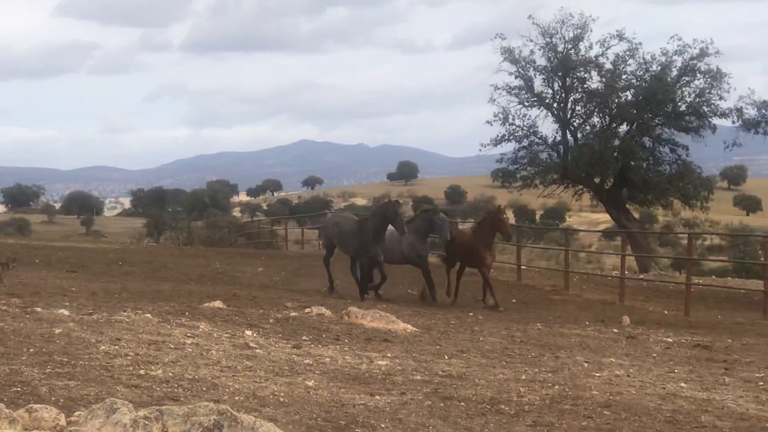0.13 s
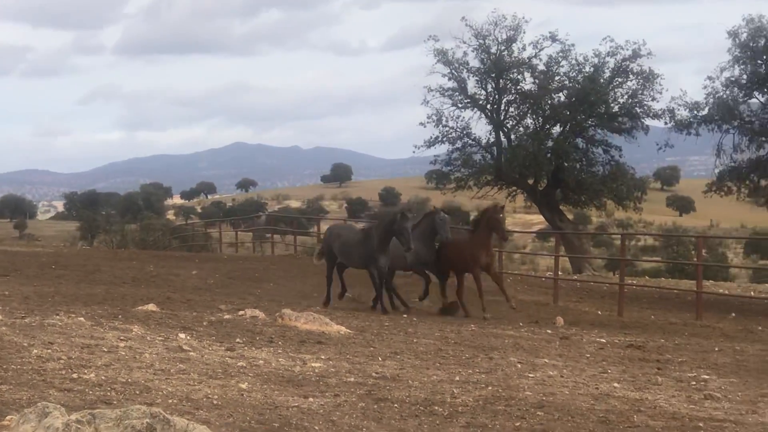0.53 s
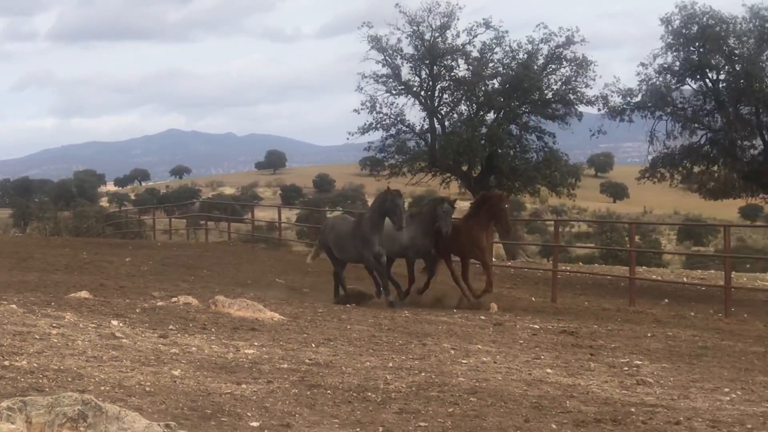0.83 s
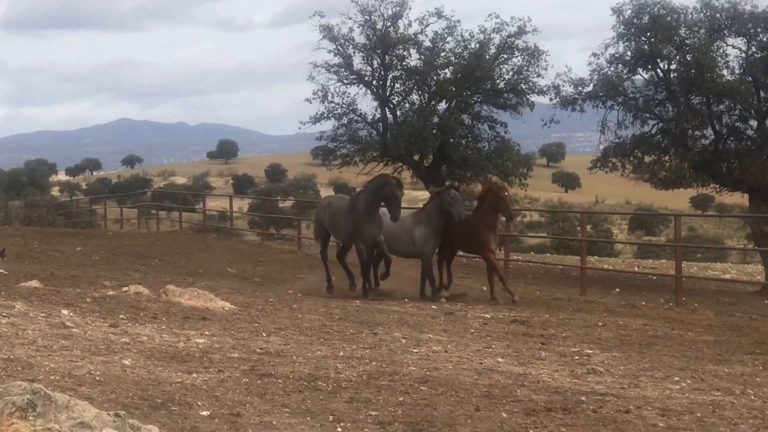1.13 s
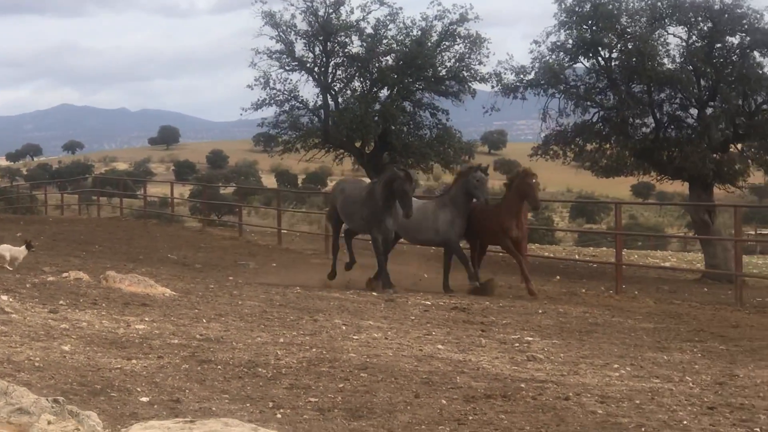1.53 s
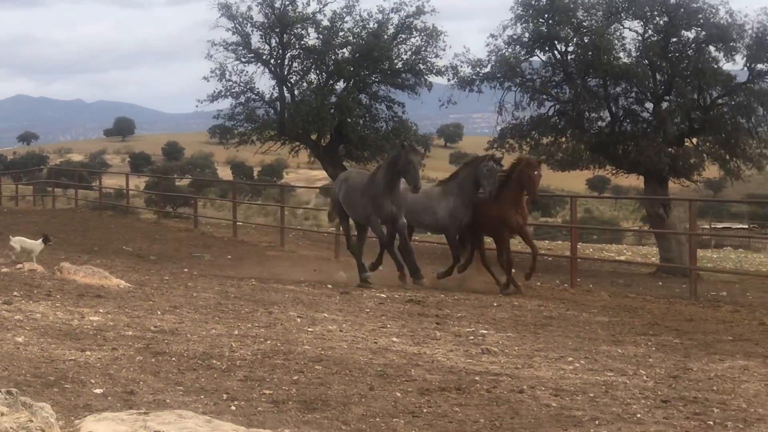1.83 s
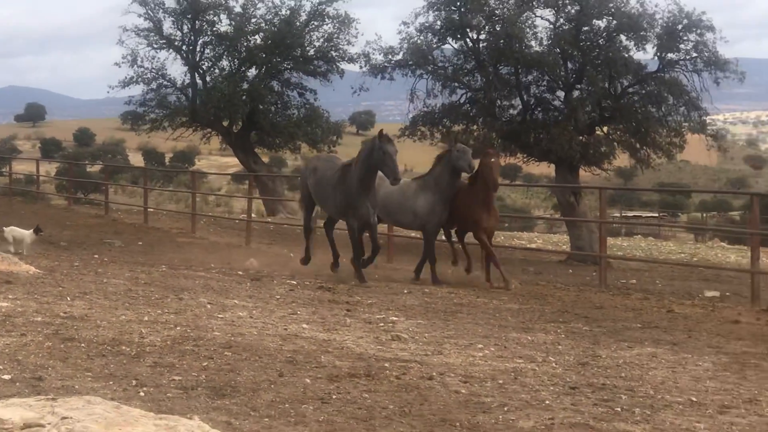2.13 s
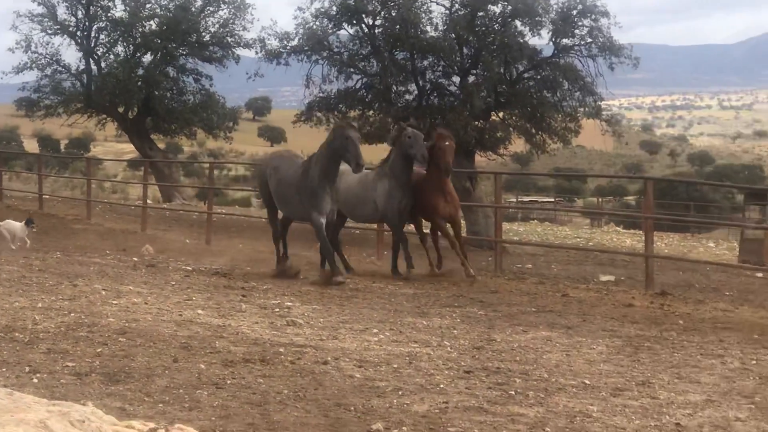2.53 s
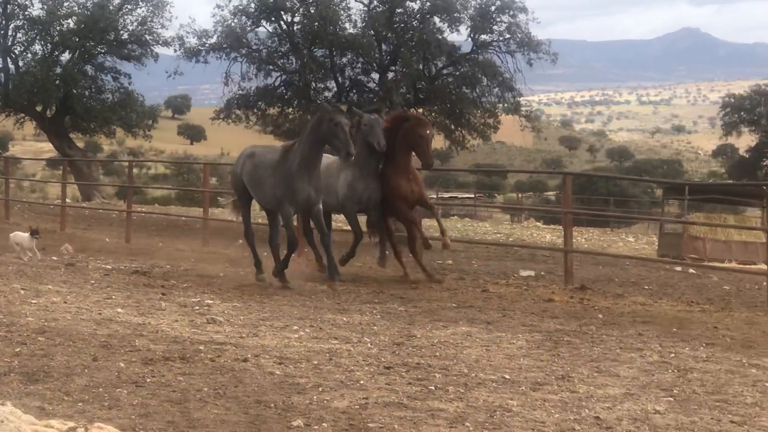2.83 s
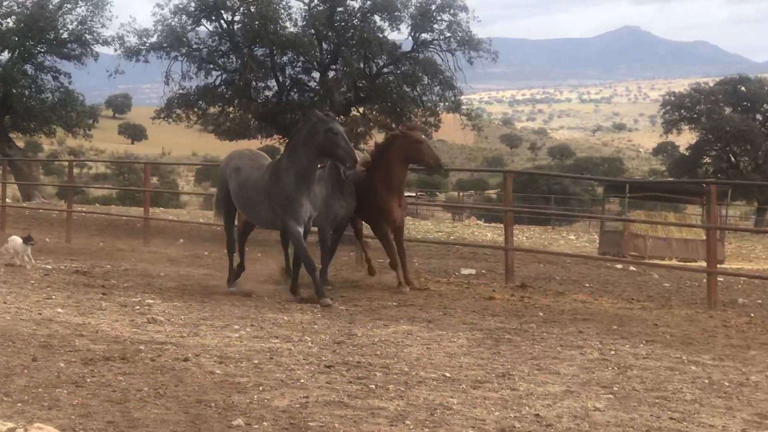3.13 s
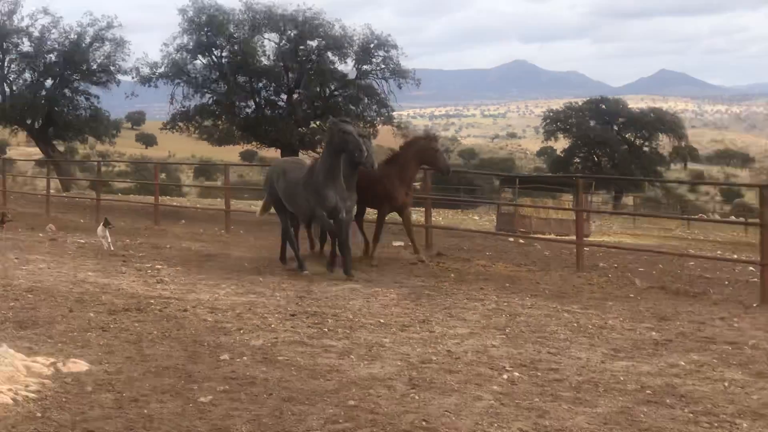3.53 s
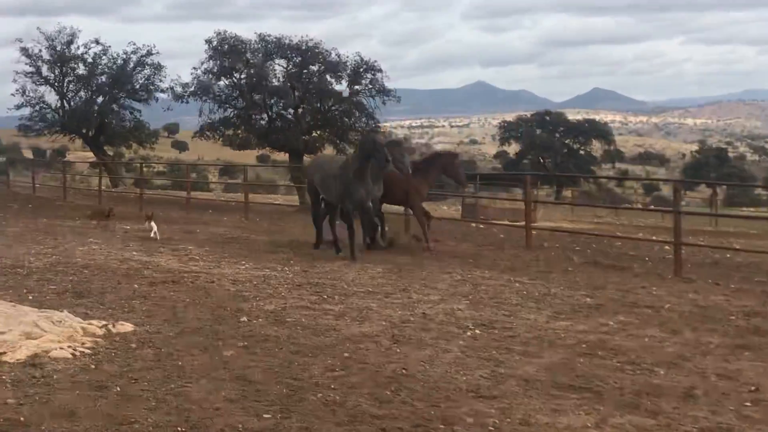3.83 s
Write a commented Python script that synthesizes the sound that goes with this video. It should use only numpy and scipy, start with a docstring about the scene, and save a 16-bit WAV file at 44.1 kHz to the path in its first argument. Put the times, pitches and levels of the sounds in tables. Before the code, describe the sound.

A horse squeals from about 0.3 to 2.1 seconds: a thin, fluttering, whistle-like tone that rises slightly, then sinks and turns hoarse from around 1. Hooves thud, click and scuff on dry dirt throughout; a brief snort comes at 2.2 and a stone clinks at 2.8. Distant birds twitter. Wind rumbles in lumps, around 1 and strongest near 2.9-3.2, over faint outdoor hiss.

```python
"""Filtered noise gives a faint outdoor hiss, and lumpy turbulence with brief swings buffets the microphone.
Horses canter over a dry dirt paddock: grains trample, sines thud, noise bursts click, scrape and scuff grit.
One horse gives a long, thin squeal, a clean gliding tone that sinks and turns hoarse in wavering strands.
Small birds twitter in the distance as short sine glides; later a chopped puff of noise is a horse's snort,
and decaying sines ring as a hoof strikes a stone. A very faint electrical whine lies under it all."""
import sys
import numpy as np
from scipy import signal
from scipy.fft import rfft, irfft
from scipy.io import wavfile

SR = 44100
rng = np.random.default_rng(int(sys.argv[2]) if len(sys.argv) > 2 else 0)


def digitize_waveform(pressure):
    """Quantize a signal to 16-bit integers and store it at the path in sys.argv[1].

    Rows of a 2-D input are taken as channels; values are limited to [-1, 1].
    """
    field = np.atleast_2d(pressure).T
    bounded = np.clip(field, -1, 1)
    quanta = np.round(bounded * 32767).astype(np.int16)
    wavfile.write(sys.argv[1], SR, quanta)


N = 176400
T = np.arange(N) / SR  # seconds


def amp(db):
    """Turns decibels into gain."""
    return 10 ** (np.asarray(db) / 20)


def unit(x):
    """Scales a signal to rms 1."""
    return x / np.sqrt(np.mean(x ** 2) + 1e-20)


def curve(rows, axis=1):
    """Draws one column of a control table as straight lines through every sample."""
    rows = np.array(rows)
    return np.interp(T, rows[:, 0], rows[:, axis])


def add(mix, s, sound):
    """Mixes a sound in at a time in seconds, cut off at the end of the scene."""
    part = mix[max(0, round(s * SR)):][:len(sound)]
    part += sound[:len(part)]


def colour(x, points):
    """Filters by a spectrum of (Hz, dB) points on a log frequency scale, to rms 1."""
    f, db = np.transpose(points)
    log_hz = np.log(np.fft.rfftfreq(N, 1 / SR) + 1)
    gain = amp(np.interp(log_hz, np.log(f), db))
    return unit(irfft(rfft(x) * gain, N))


def band(x, low_hz, high_hz):
    """Keeps one frequency band of a sound."""
    return signal.sosfilt(signal.butter(2, [low_hz, high_hz], "band", fs=SR, output="sos"), x)


def drift(hz):
    """Smooth chance motion of rms 1, low-passed with half gain at the given rate."""
    rolloff = 1 + (np.fft.rfftfreq(N, 1 / SR) / hz) ** 4
    return unit(irfft(rfft(rng.standard_normal(N)) / rolloff, N))


def fuzzy(hz, width):
    """Turbulence in a moving resonance: two slow noises ride on a cosine and a sine."""
    turn = 2 * np.pi * np.cumsum(hz) / SR
    return unit(drift(width / 2) * np.cos(turn) + drift(width / 2) * np.sin(turn))


def strand(hz, width):
    """An unsteady partial with turbulence around it."""
    wobble, line_share = .03, .45  # rms share of the pitch, share of the power
    line = unit(np.sin(2 * np.pi * np.cumsum(hz * (1 + wobble * drift(58.6))) / SR))
    return np.sqrt(line_share) * line + np.sqrt(1 - line_share) * fuzzy(hz, width)


def field(x):
    """Faint scatter from trees and ground: a decaying noise tail that starts 12 ms late."""
    t, t60_s = T[:SR], .5
    tail = rng.standard_normal(SR) * amp(-60 * t / t60_s) * (t > .012)
    return signal.fftconvolve(x, tail / np.linalg.norm(tail))[:N]


def air():
    """Steady outdoor hiss: noise shaped by one fixed spectrum."""
    # Spectrum of the hiss. Each row: frequency in Hz, relative level in dB.
    air_spectrum = [(59, -5.5), (100, -6), (156, -1), (281, -16.5), (697, -17.5), (774, -22.5),
                    (1960, -26.5), (2630, -29.5), (3050, -25.5), (4190, -29.5), (4860, -32.5),
                    (6120, -31.5), (7730, -36.5), (8410, -35.5), (15500, -40.5)]
    air_db = -61.5  # rms
    return amp(air_db) * colour(rng.standard_normal(N), air_spectrum)


def wind():
    """Lumpy turbulence at the microphone, with single eddies as brief pressure swings."""
    # Wind on the microphone, before trim.
    # Each row: time in seconds, rumble level in dB (mainly below 130 Hz), flap level in dB (mainly above).
    wind_levels = [(0, -55.5, -54.5), (0.08, -65.5, -63), (0.19, -39, -55.5), (0.27, -57.5, -73),
                   (0.36, -54, -59.5), (0.53, -62, -66), (0.6, -51.5, -56.5), (0.72, -58, -59),
                   (0.82, -41.5, -55), (0.86, -52, -61.5), (0.94, -48, -48.5), (1.03, -37.5, -38.5),
                   (1.085, -42, -35.5), (1.12, -40.5, -45.5), (1.2, -42, -46.5), (1.27, -52.5, -52.5),
                   (1.34, -41.5, -45), (1.44, -43.5, -49), (1.55, -55, -48.5), (1.63, -47.5, -45.5),
                   (1.71, -52, -49), (1.78, -54, -62), (1.85, -38, -49.5), (1.93, -51, -51.5),
                   (2.04, -68, -52.5), (2.12, -46.5, -47), (2.2, -64.5, -64), (2.28, -56, -64),
                   (2.39, -72, -72), (2.47, -55.5, -60), (2.52, -52.5, -57.5), (2.69, -50, -55),
                   (2.75, -63, -55), (2.82, -62, -88), (2.92, -28, -40.5), (3.0, -43.5, -58),
                   (3.08, -45.5, -53.5), (3.125, -23.5, -31), (3.165, -36.5, -50), (3.2, -35.5, -41.5),
                   (3.3, -39, -58), (3.38, -38.5, -52), (3.45, -56, -58.5), (3.55, -45, -56.5),
                   (3.64, -63, -60.5), (3.92, -62, -61.5), (4.0, -52, -61)]
    # Spectra of the low rumble and the flap above it. Each row: frequency in Hz, relative level in dB.
    rumble_spectrum = [(15, -46), (30, -28), (48, 1.5), (75, 1), (120, -4), (180, -14.5), (400, -60),
                       (1000, -112)]
    flap_spectrum = [(40, -16), (100, -8), (150, -1), (230, -6.5), (330, -12), (500, -21.5), (800, -39.5),
                     (3000, -67)]
    # Single eddies striking the microphone.
    # Each row: centre in seconds, frequency in Hz, level in dB of the sine before its envelope.
    buffets = [(.141, 137, -38), (.193, 170, -37), (0.217, 171, -28), (.397, 240, -40.5),
               (.467, 179, -43.5), (0.965, 218, -37), (1.001, 175, -32), (1.035, 167, -26.5),
               (1.099, 199, -24.5), (1.334, 170, -31.5), (1.354, 233, -36), (1.405, 217, -31.5),
               (1.467, 170, -32.5), (1.519, 149.3, -29), (1.654, 114, -28.5), (1.873, 187, -26.5),
               (2.854, 67, -31.5), (2.917, 135, -25), (2.929, 83, -18.5), (3.11, 116, -15),
               (3.123, 178, -16.5), (3.135, 63, -20.5), (3.185, 155, -23.5), (3.533, 55, -38)]
    rumble_trim_db, flap_trim_db = -1, -1
    gust_db, gust_hz = 5.5, 36.6  # rms swing, rate
    eddy_cycles, eddy_reach = .3, 20  # envelope width in cycles, limit in envelope widths

    rumble = colour(rng.standard_normal(N), rumble_spectrum)
    rumble *= amp(curve(wind_levels) + rumble_trim_db)
    gusty = rng.standard_normal(N) * amp(gust_db * drift(gust_hz))
    flap = colour(gusty, flap_spectrum) * amp(curve(wind_levels, axis=2) + flap_trim_db)
    out = rumble + flap
    for s, hz, db in buffets:
        cycles = (T - s) * hz
        envelope = 1 / np.cosh(np.clip(cycles / eddy_cycles, -eddy_reach, eddy_reach))
        out += amp(db) * np.sin(2 * np.pi * cycles) * envelope
    return out


def hooves():
    """Dull decaying thuds, stone clicks, hollow scrapes and grainy scuffs over light trampling."""
    # Hooves thudding on packed earth.
    # Each row: start in seconds, frequency in Hz, level in dB of the sine before onset and decay.
    thuds = [(.657, 460, -51.5), (1.022, 413, -39), (1.088, 540, -42.5), (2.042, 290, -43),
             (2.105, 483, -45.5), (2.132, 283, -39.5), (2.214, 240, -41.5), (2.587, 200, -38),
             (2.68, 150, -35.5), (3.375, 415, -46.5), (3.604, 534, -38), (3.76, 460, -40.5),
             (3.981, 240, -40.5)]
    # Hooves clicking on stones, and two longer, hollow scrapes of a scuff near 1.2 kHz.
    # Each row: start in seconds, frequency in Hz, peak in dB, time of the burst to fall 60 dB in seconds.
    clicks_and_scrapes = [(.466, 3800, -59, 0.055), (.471, 7940, -56.5, 0.028), (1.02, 1320, -51.5, 0.022),
                          (1.577, 2522, -49.5, .03), (1.915, 1710, -48.5, 0.025),
                          (2.0192, 1830, -47, 0.018), (2.486, 2110, -52, 0.022),
                          (2.532, 2150, -50.5, 0.043), (2.796, 1500, -50, 0.037), (3.175, 1140, -55, 0.28),
                          (3.225, 1300, -55.5, 0.2), (3.94, 2760, -51.5, 0.054), (3.951, 2870, -51, 0.036)]
    # Hooves scuffing grit.
    # Each row: start in seconds, time to fall to 1/e in seconds, level in dB before onset and fall.
    scuffs = [(0.458, 0.017, -61), (0.541, 0.058, -67), (1.556, 0.059, -64.5), (1.886, 0.076, -60.5),
              (2.177, 0.02, -62.5), (2.327, 0.028, -66), (2.484, 0.035, -59), (2.529, 0.031, -58.5),
              (2.622, 0.1, -60), (2.774, 0.21, -67), (2.944, 0.29, -70), (3.15, 0.13, -61),
              (3.322, 0.07, -65.5), (3.482, 0.063, -63.5), (3.742, 0.047, -65.5), (3.836, 0.047, -65),
              (3.942, 0.022, -62.5)]
    # Spectrum of the grit. Each row: frequency in Hz, relative level in dB.
    grit_spectrum = [(150, 8.5), (500, 2.5), (1000, 5), (2000, -1), (2700, -1), (4000, -1.5), (5200, -11.5),
                     (8000, -19.5), (15000, -28.5)]
    thud_t60_s, crush_db = 0.03, -16  # crushed earth, relative to the thud's sine
    grain_db, grain_hz = 2.5, 400  # rms swing, rate
    trample_per_s, trample_db, step_decay_s = 110, -71, 0.023

    out, t = np.zeros(N), T[:SR // 4]
    for s, hz, db in thuds:
        crush = unit(band(rng.standard_normal(len(t)), hz / 2, hz * 2))
        body = np.sin(2 * np.pi * hz * t) + amp(crush_db) * crush
        onset = np.minimum(t / 0.0017, 1)
        add(out, s, amp(db - 60 * t / thud_t60_s) * onset * body)
    for s, hz, db, t60 in clicks_and_scrapes:
        burst = rng.standard_normal(len(t)) * amp(-60 * t / t60)
        contact = band(burst, hz * 0.63, hz * 1.22)
        add(out, s, amp(db) * contact / abs(contact).max())

    push = np.zeros(N)
    for s, length, db in scuffs:
        u = T[:SR // 2] / length
        add(push, s, amp(db) * np.minimum(u / 0.12, 1) * np.exp(-u ** 2))
    taps = (rng.random(N) < trample_per_s / SR).astype(float)
    steps = signal.lfilter([1], [1, -np.exp(-1 / (step_decay_s * SR))], taps)
    grit = colour(rng.standard_normal(N) * amp(grain_db * drift(grain_hz)), grit_spectrum)
    return out + grit * np.hypot(push, amp(trample_db) * unit(steps))


def squeal():
    """A fluttering whistle-like tone that breaks up into wavering, hoarse strands."""
    # Pitch of the clean tone. Each row: time in seconds, pitch in Hz before jitter.
    pitch = [(.33, 1680), (.46, 1710), (.58, 1775), (.8, 1814), (.95, 1780), (1.12, 1737), (1.29, 1788),
             (1.4, 1730), (1.47, 1744), (1.52, 1706), (1.64, 1649), (1.69, 1569), (1.77, 1532),
             (1.84, 1588), (1.9, 1534), (2.05, 1551)]
    # Clean tone before flutter. Each row: time in seconds, level in dB, level of its octave in dB.
    clean = [(.3, -88, -105), (.37, -73, -99), (.44, -66.5, -97), (.54, -69, -90), (.58, -58, -78.5),
             (.8, -57, -73), (.95, -60, -77), (1.06, -68, -86), (1.15, -65, -90), (1.23, -67.5, -88),
             (1.29, -57.5, -82), (1.35, -68, -92), (1.48, -70, -94), (1.52, -62.5, -88), (1.56, -72, -94),
             (1.71, -71, -92), (1.76, -66.5, -87), (1.83, -68, -89), (1.86, -78, -94), (2.05, -83, -99)]
    # Brief catches in the clean tone. Each row: centre in seconds, depth from 0 to 1.
    catches = [(.475, .5), (.53, .6), (.635, .8), (.686, .35), (.734, 1), (.782, .95), (.846, .7),
               (.872, .6), (.904, .9), (.945, .35), (.995, .7)]
    # Hoarse part. Each row: time in seconds, centre in Hz, level in dB.
    hoarse = [(.4, 1712, -94), (.8, 1833, -70.5), (.97, 1731, -67.5), (1.05, 1697, -71),
              (1.11, 1675, -61.5), (1.3, 1656, -69), (1.47, 1607, -63.5), (1.62, 1584, -63),
              (1.78, 1541, -65), (1.86, 1515, -70), (2.1, 1470, -88)]
    # Strands at fixed ratios to the hoarse centre: one below that splits off as the squeal sinks,
    # a late resonance about a third above the hoarse centre, a little below the upper one,
    # the upper resonance and the octave. Each row: time in seconds, level in dB.
    lower = [(.9, -100), (1.1, -89), (1.45, -72), (1.7, -70), (1.88, -74), (2.05, -88)]
    late = [(1.3, -99), (1.5, -73), (1.75, -66.5), (1.899, -83)]
    upper = [(.72, -85), (.88, -75), (1.03, -75), (1.2, -71), (1.33, -74), (1.47, -74), (1.65, -79),
             (2.05, -87)]
    octave = [(.6, -94), (.8, -85), (1.02, -74), (1.12, -68), (1.22, -73), (1.5, -74.5), (1.75, -75.5),
              (2.0, -92)]
    jitter, jitter_hz = 0.004, 52.7  # rms share of the pitch, rate
    catch_s = .011  # time from the centre of a catch to 1/e of its depth
    flutter_db, flutter_hz = 1.2, 50  # rms swing, rate
    rasp_db, rasp_hz = 2, 70  # rms swing, rate
    break_db, break_hz = 3.5, 22  # rms swing, rate
    hoarse_width_hz, side_width_hz = 250, 380

    turn = 2 * np.pi * np.cumsum(curve(pitch) * (1 + jitter * drift(jitter_hz))) / SR
    catch = sum(depth * np.exp(-((T - s) / catch_s) ** 2) for s, depth in catches)
    flutter = (1 - catch) * amp(flutter_db * drift(flutter_hz) + 0.5)
    partials = np.sin(turn) * amp(curve(clean)) + np.sin(2 * turn) * amp(curve(clean, axis=2))
    tone = np.sqrt(2) * flutter * partials  # root 2 makes the levels rms

    hz = curve(hoarse)
    roughness = unit(amp(rasp_db * drift(rasp_hz)))
    rasp = strand(hz, hoarse_width_hz) * amp(curve(hoarse, axis=2)) * roughness
    for ratio, levels in (.92, lower), (1.3, late), (1.36, upper), (2, octave):
        broken = unit(amp(break_db * drift(break_hz)))
        rasp = rasp + strand(hz * ratio, side_width_hz) * broken * amp(curve(levels))
    # 14 ms fades at both ends
    sounding = np.clip(np.minimum(T - clean[0][0], hoarse[-1][0] - T) / 0.014, 0, 1)
    return (tone + rasp) * sounding


def birds():
    """Quick, warbling sine glides in the distance, with their scatter."""
    # Bird chirps, with pitches before warble and levels before scatter.
    # Each row: start in seconds, length in seconds, start, middle and end pitch in Hz, rms level in dB.
    chirps = [(0.573, 0.047, 4620, 4500, 3680, -75.5), (0.674, 0.026, 4450, 3750, 3150, -66),
              (0.733, .045, 3400, 3260, 2630, -71), (1.107, 0.021, 5860, 5500, 5850, -71),
              (1.124, 0.027, 4650, 4400, 3450, -67.5), (1.207, 0.011, 3700, 4200, 4650, -62.5),
              (1.225, 0.014, 4150, 4450, 4680, -66), (1.239, 0.033, 4700, 5150, 4800, -74),
              (1.25, 0.049, 7000, 6630, 5870, -76), (1.269, 0.021, 4570, 4740, 3780, -66),
              (1.291, 0.016, 5550, 5480, 4650, -70), (1.309, 0.027, 4700, 4400, 3630, -66),
              (1.345, 0.046, 5340, 5500, 4600, -76), (1.348, .027, 4570, 4350, 3600, -72),
              (1.708, 0.032, 4790, 5120, 5240, -75), (1.851, 0.045, 6140, 5750, 4900, -72),
              (1.987, .042, 3930, 4180, 4900, -69.5), (2.187, 0.044, 3580, 3000, 2640, -75),
              (2.239, 0.043, 3550, 3780, 3830, -68), (2.365, 0.052, 4040, 3620, 3300, -77),
              (2.632, 0.032, 2820, 3080, 3240, -80), (2.797, 0.06, 3250, 3420, 3580, -75),
              (2.801, .125, 1752, 1826, 1898, -74.5), (2.923, 0.046, 3300, 3400, 3650, -77),
              (2.997, 0.11, 4250, 4820, 5110, -79.5), (3.088, 0.044, 4960, 5020, 5030, -76),
              (3.219, 0.04, 4230, 4350, 3820, -71), (3.269, 0.068, 3090, 3530, 4000, -74)]
    warble_depth, warble_hz = .015, 170  # rms share of the pitch, rate
    echo_db = -3  # scatter, relative to the chirps

    out, warble = np.zeros(N), 1 + warble_depth * drift(warble_hz)
    for s, length, a, b, c, db in chirps:
        u = np.linspace(0, 1, int(length * SR))
        glide = np.polyval(np.polyfit([0, .5, 1], [a, b, c], 2), u)
        hz = glide * warble[round(s * SR):][:len(u)]
        swell = np.sqrt(u * (1 - u))
        add(out, s, amp(db) * unit(swell * np.sin(2 * np.pi * np.cumsum(hz) / SR)))
    return out + amp(echo_db) * field(out)


def snort():
    """A horse's nostrils flap and chop a short puff of air."""
    # Spectrum of the nostrils. Each row: frequency in Hz, relative level in dB.
    nostril = [(80, -18), (170, 4.5), (280, -12), (550, -6.5), (800, -23), (1300, -19), (2500, -26.5),
               (4000, -22), (6000, -35), (14000, -53)]
    start_s, length_s = 2.241, 0.087  # length: time to fall to 1/e
    flap_hz, level_db = 89.6, -52  # level before onset and fall

    puffs = np.exp(-((T * flap_hz) % 1) / 0.19)
    flow = (puffs + 0.62) * rng.standard_normal(N) + 0.5 * (puffs - puffs.mean())
    u = np.maximum(T - start_s, 0) / length_s
    envelope = np.minimum(u / 0.066, 1) * np.exp(-u ** 4)
    return amp(level_db) * colour(flow, nostril) * envelope


def clink():
    """A stone struck by a hoof rings as decaying sines."""
    # Modes of the stone. Each row: frequency in Hz, level in dB at the strike.
    modes = [(1220, -56), (1950, -52), (3400, -70)]
    start_s, t60_s = 2.795, 0.065
    out, t = np.zeros(N), T[:SR // 4]
    ring = sum(amp(db - 60 * t / t60_s) * np.sin(2 * np.pi * hz * t) for hz, db in modes)
    add(out, start_s, ring)
    return out


def scene():
    """Weather, horses and birds at one microphone, the horses with faint scatter."""
    weather = air() + wind()
    horses = hooves() + squeal() + snort() + clink()
    scatter_db = -11.0  # relative to the horses
    return (weather + horses + amp(scatter_db) * field(horses) + birds())[None]


def record(dry):
    """A faint electrical whine of harmonics 4 to 14, then the band limit."""
    whine_hz, whine_db = 1017.65, -93  # absent fundamental, peak of each harmonic
    edge_hz = 15750
    whine = sum(np.sin(2 * np.pi * k * whine_hz * T) for k in range(4, 15))
    low_pass = signal.firwin(511, edge_hz, window=("kaiser", 9), fs=SR)
    return signal.oaconvolve(dry + amp(whine_db) * whine, low_pass[None], "same")


dry = scene()
out = record(dry)
digitize_waveform(out)
```